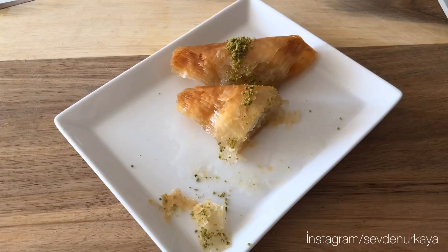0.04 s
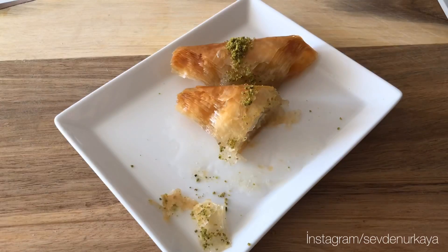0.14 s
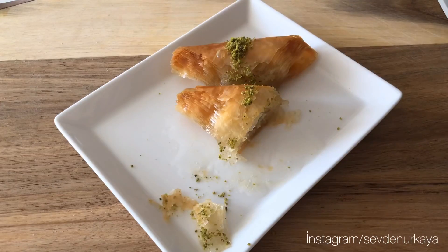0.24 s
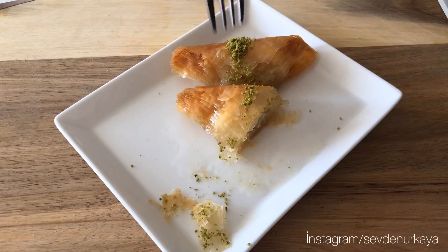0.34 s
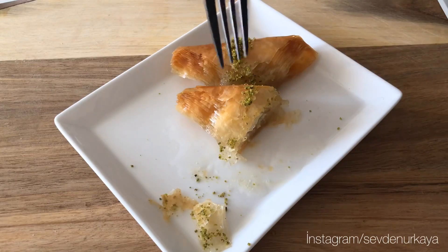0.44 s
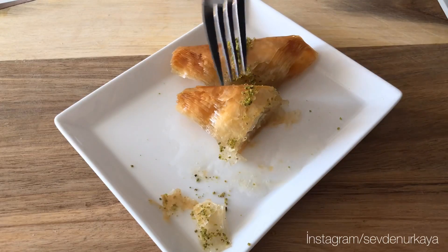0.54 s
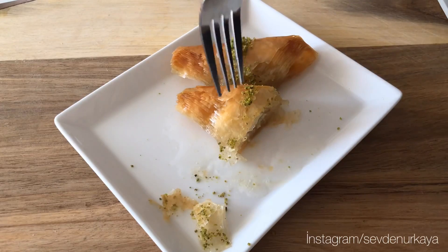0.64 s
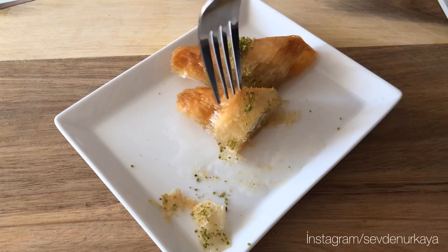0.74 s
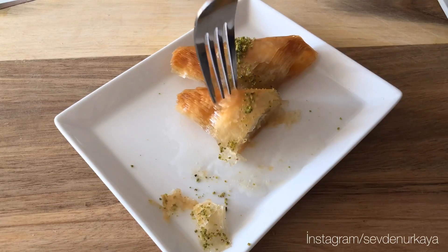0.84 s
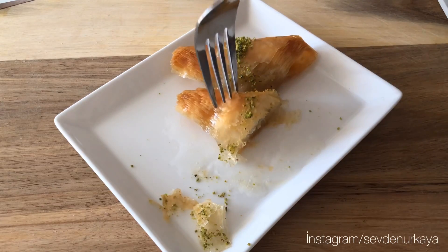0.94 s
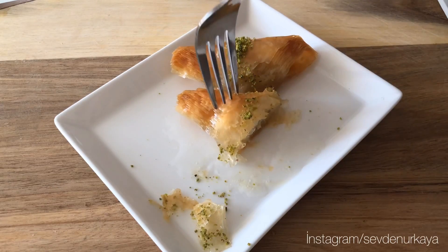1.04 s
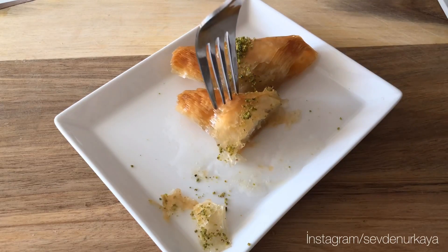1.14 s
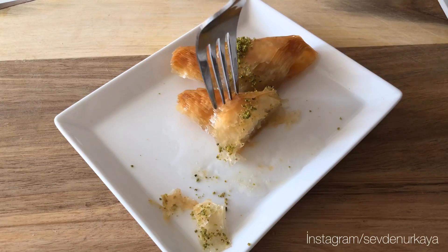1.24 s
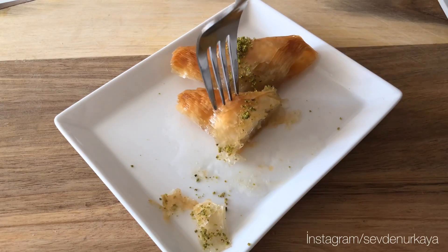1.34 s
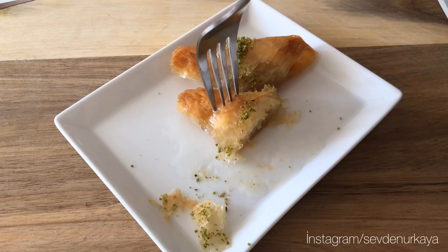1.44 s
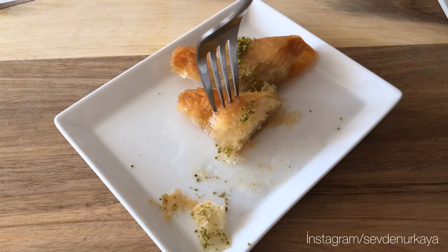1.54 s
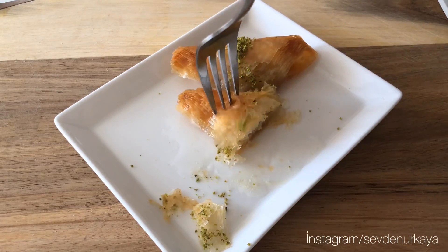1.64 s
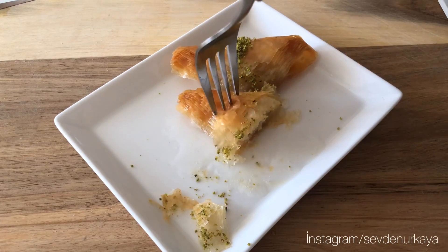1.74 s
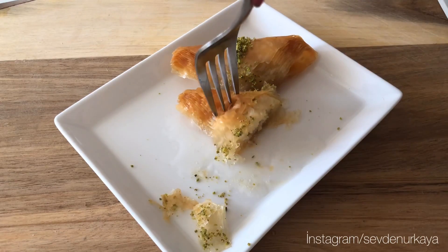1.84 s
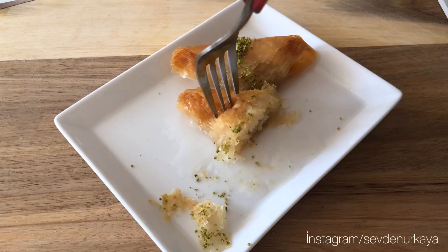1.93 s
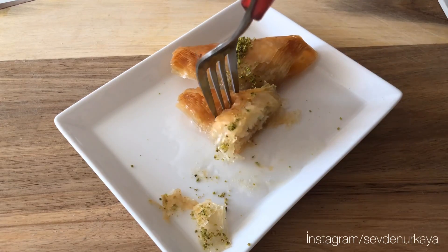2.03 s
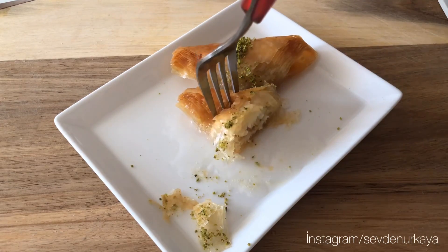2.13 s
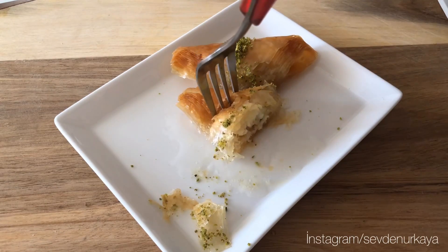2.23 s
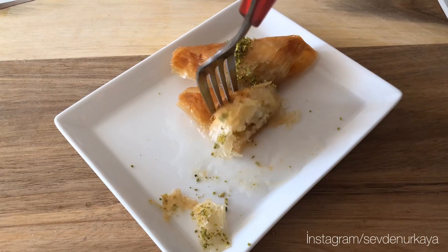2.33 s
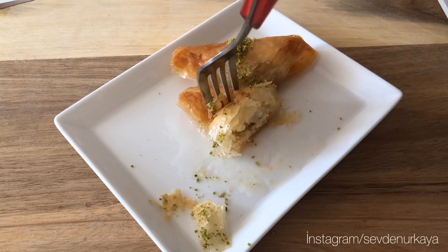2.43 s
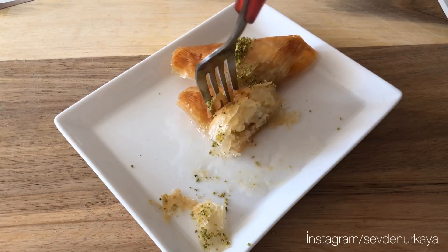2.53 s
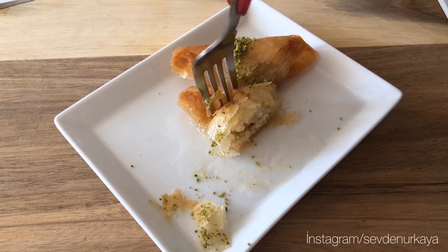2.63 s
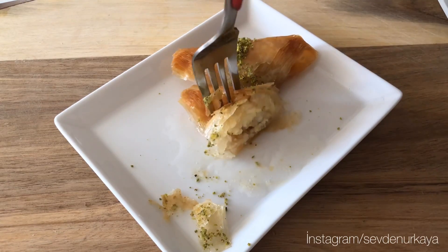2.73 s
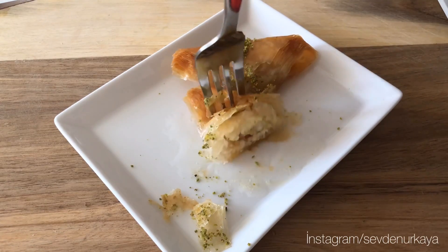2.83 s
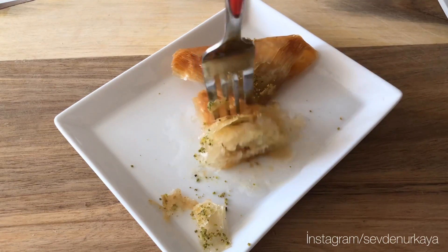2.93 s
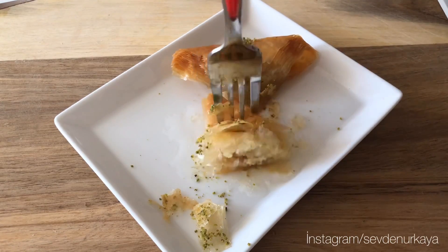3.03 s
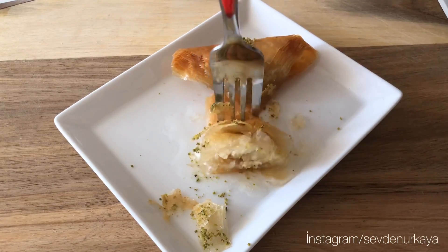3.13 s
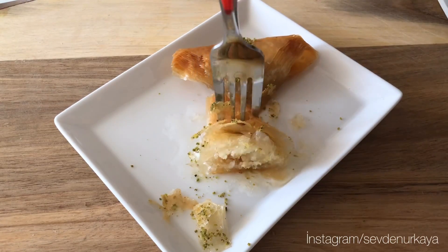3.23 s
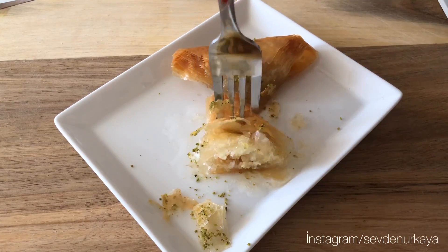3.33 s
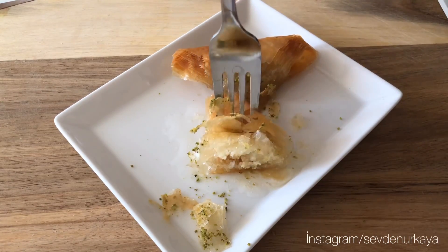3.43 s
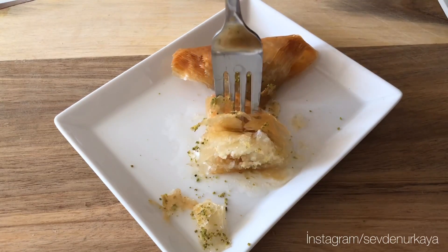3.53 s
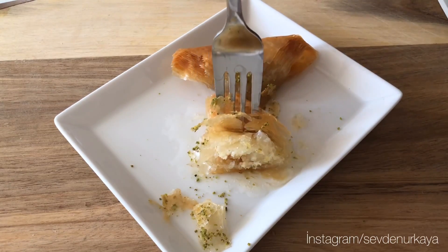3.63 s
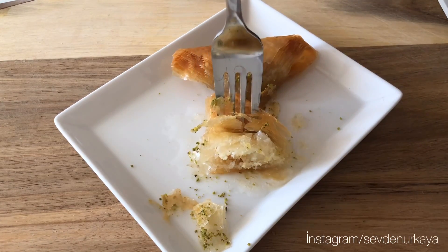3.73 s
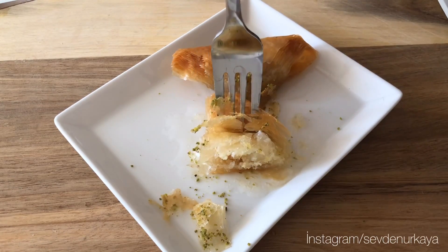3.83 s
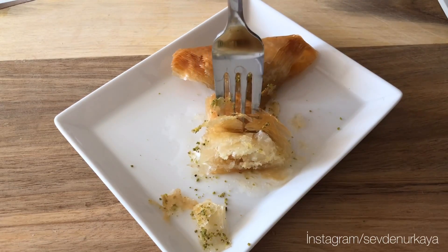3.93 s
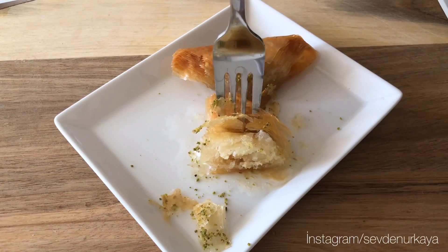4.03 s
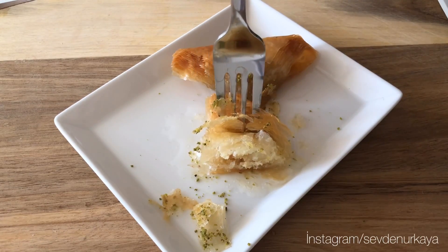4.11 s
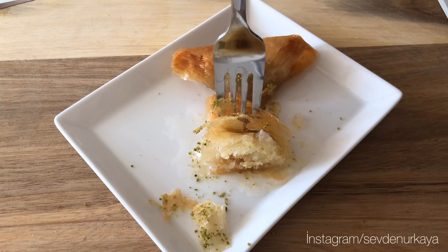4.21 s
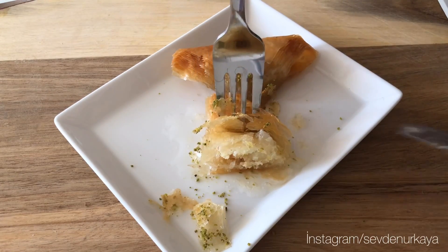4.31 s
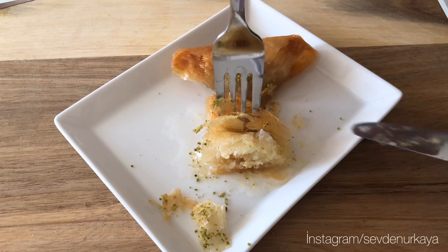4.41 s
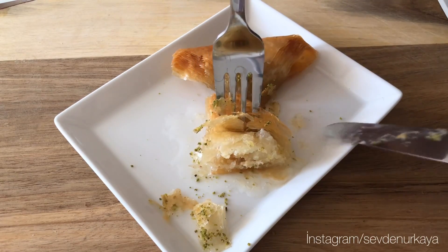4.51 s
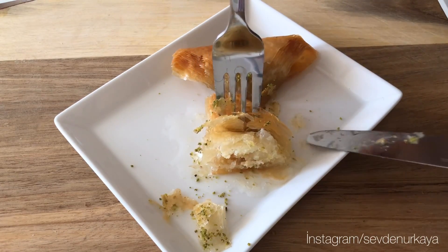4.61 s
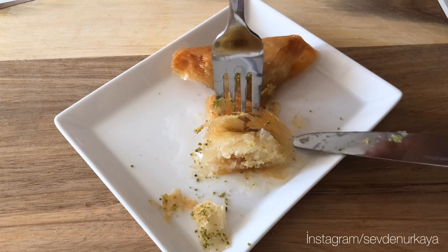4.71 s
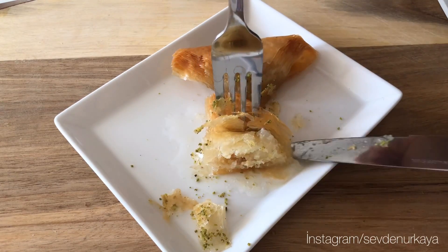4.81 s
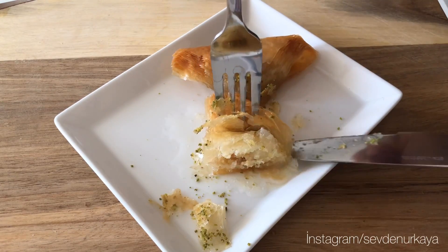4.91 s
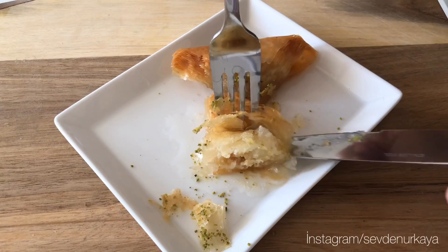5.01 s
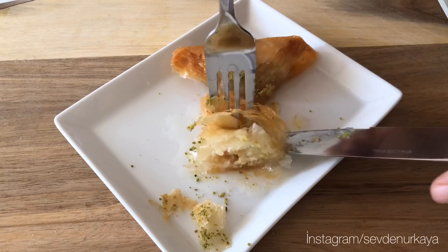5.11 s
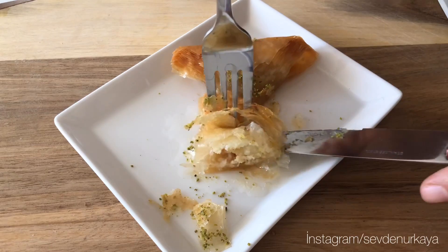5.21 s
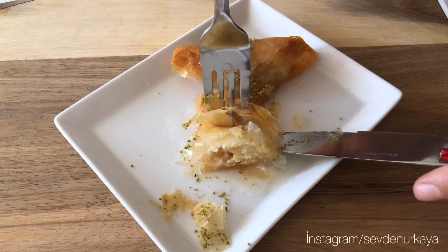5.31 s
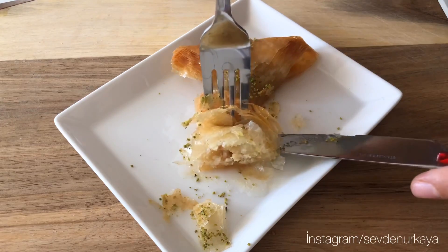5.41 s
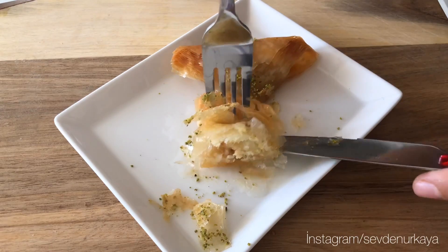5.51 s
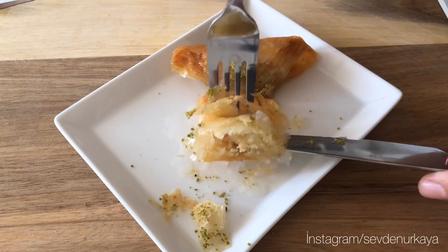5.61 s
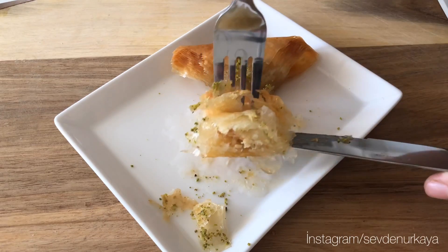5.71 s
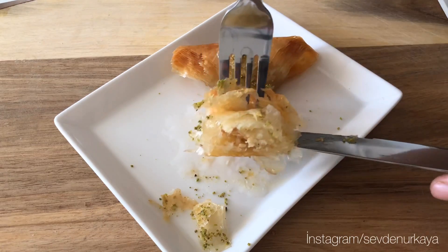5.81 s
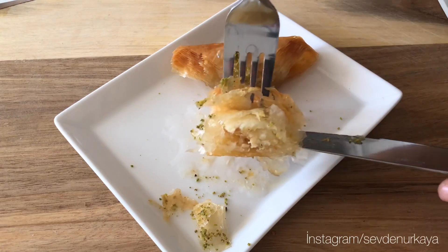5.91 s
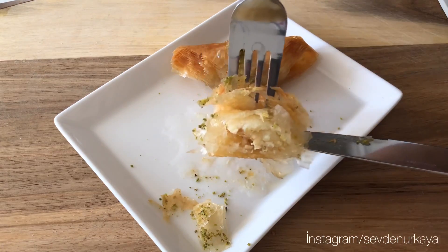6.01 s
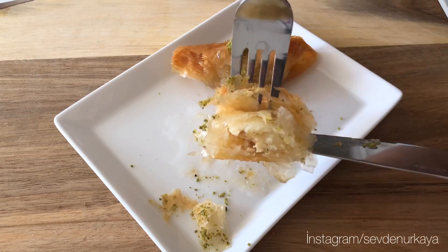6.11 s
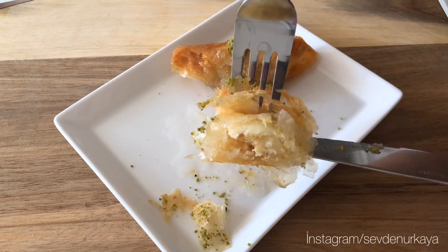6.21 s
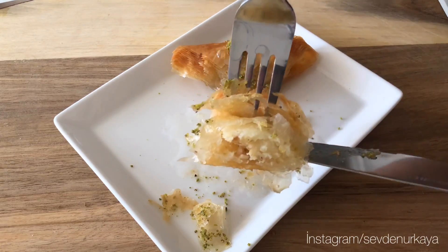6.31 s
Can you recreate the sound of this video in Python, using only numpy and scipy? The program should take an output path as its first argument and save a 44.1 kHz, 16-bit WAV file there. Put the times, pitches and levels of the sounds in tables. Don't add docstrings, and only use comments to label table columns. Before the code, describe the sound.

Dry, bright crackling of flaky pastry crushed by a fork, a few sharp snaps, one light cutlery clink on ceramic, faint refrigerator hum.

```python
import sys
import numpy as np
from scipy import signal
from scipy.fft import rfft, irfft, next_fast_len
from scipy.io import wavfile
from scipy.ndimage import uniform_filter1d, map_coordinates

SR = 44100
rng = np.random.default_rng(int(sys.argv[2]) if len(sys.argv) > 2 else 0)


def ratio(d):
    e = np.asarray(d, float) / 20
    return 10 ** e


def int16_out(signal):
    q = np.round(np.clip(np.atleast_2d(signal).T, -1, 1) * 32767)
    wavfile.write(sys.argv[1], SR, q.astype(np.int16))


N = 280108
T = np.arange(N) / SR


def unit(x):
    return x / np.sqrt(np.mean(x ** 2) + 1e-20)


def along(points, hz):
    f, v = np.transpose(points)
    return np.interp(np.log(hz + 1), np.log(f + 1), v)


def wobble(rate):
    knots = rng.standard_normal(int(N * rate / SR) + 4)
    return np.interp(T, T[::64], map_coordinates(knots, [T[::64] * rate]))


def filtered(x, response):
    m = next_fast_len(N + SR // 2)
    return irfft(rfft(x, m) * response(np.fft.rfftfreq(m, 1 / SR)), m)[:N]


def coloured(x, spectrum):
    shaped = filtered(x, lambda hz: ratio(along(spectrum, hz)))
    return unit(shaped) * np.sqrt(np.mean(x ** 2))


def lay(s, shapes):
    at = np.round(s * SR).astype(int)[:, None] + np.arange(shapes.shape[1])
    return np.bincount(at.ravel(), shapes.ravel(), N + SR)[:N]


def swell(t, rise, fall):
    after = t - rise * 2
    return np.exp(-(np.minimum(after, 0) / rise) ** 2 - np.maximum(after, 0) / fall)


# multiple (of the turning rate), level_db [dB rms]
ORDERS_DB = [(1, -53.5), (2, -72), (15, -84.5), (18, -93.5), (20, -78.5), (23, -82), (24, -86.5), (26, -92),
             (30, -87.5), (68, -92), (92, -90.5)]
# pitch_hz [Hz], level_db [dB per Hz]
AIR = [(20, -60.5), (40, -30), (80, -18.5), (110, -22), (155, -14), (230, -23.5), (480, -26.5),
       (700, -33.5), (1500, -36.5), (2200, -46.5), (3300, -46), (6000, -45), (9500, -48), (14000, -56)]
MOTOR_HZ = 66.5


def kitchen():
    turn = 2 * np.pi * np.cumsum(MOTOR_HZ + .05 * wobble(1.5)) / SR
    sway = wobble(5.95)
    hum = np.zeros(N)
    for k, db in ORDERS_DB:
        k = round(k)
        level_db = db + (0.9 + .04 * k) * np.roll(sway, k * 3000)
        hum += np.sqrt(2) * ratio(level_db) * np.sin(k * turn + 6 * rng.random())
    air = coloured(rng.standard_normal(N), AIR)
    return hum + ratio(-60.5 + 0.31 * wobble(3.7)) * air


# start_s [s], hold_s [s], crumb_spray_db [dB rms]
PUSHES = [(0.819, 0.024, -60.5), (0.867, 0.017, -58), (0.942, 0.072, -61), (1.038, 0.13, -65),
          (1.385, 0.049, -59), (1.494, 0.076, -54.5), (1.642, 0.032, -37), (1.714, 0.16, -49.5),
          (1.83, 0.057, -43), (1.96, 0.084, -37), (2.05, .13, -47.5), (2.269, .17, -45),
          (2.48, 0.19, -68.5), (2.656, 0.14, -61.5), (2.836, 0.041, -61.5), (2.92, 0.16, -62),
          (3.09, 0.14, -67), (3.372, .09, -61.5), (3.493, 0.054, -49), (3.553, 0.094, -62.5),
          (3.7, 0.47, -77.5), (4.126, 0.091, -68.5), (4.25, 0.37, -74.5), (4.498, 0.063, -67.5),
          (4.86, 0.11, -64.5), (4.97, 0.18, -65), (5.18, 0.086, -64.5), (5.347, 0.12, -72),
          (5.577, 0.085, -61.5), (5.633, 0.053, -70), (5.881, 0.38, -80)]
BUILD_DB_PER_S, EASE_DB_PER_S = 451, 218.5


def pressure_db(t):
    s, hold, db = np.transpose(PUSHES)[:, :, None]
    grid = T[::64]
    build = BUILD_DB_PER_S * np.maximum(s - grid, 0)
    ease = EASE_DB_PER_S * np.maximum(grid - s - hold, 0)
    power = np.sum(ratio(db - build - ease) ** 2, axis=0)
    return np.interp(t, grid, 10 * np.log10(power + 1e-13))


# pitch_hz [Hz], level_db [dB per Hz]
FLAKE = [(400, -43.5), (1000, -33.5), (1800, -18), (2800, -12.5), (3350, -9.5), (3700, -1), (4600, -0.5),
         (5500, -5.5), (6500, -1.5), (9200, 1.5), (12000, -4.5)]


def cracks(s, db, hz, rise, cycles, rasp_db, shiver_db):
    t, dice = np.arange(256) / SR, rng.standard_normal((len(s), 3 + 256))
    size, hz = ratio(db)[:, None], hz[:, None]
    fall_s = cycles * ratio(1.5 * dice[:, 1:2]) / hz
    note = np.cos(2 * np.pi * (hz * t + dice[:, :1])) * swell(t, rise, fall_s)
    tick = ratio(rasp_db + 2.9 * dice[:, 2:3]) * swell(t, rise, 0.00018)
    shiver = ratio(shiver_db) * swell(t, 0.0004, 0.0018)
    start = s - rise * 2
    notes = filtered(lay(start, size * note), lambda f: ratio(np.minimum(along(FLAKE, f) + 6, 0)))
    return notes + coloured(lay(start, size * (tick + shiver) * dice[:, 3:]), FLAKE)


CLUMP_DB = 3.4


def crumbs():
    dice = rng.random((5500, 2))
    when = .7 + 5.6 * dice[:, 0]
    spread_db = 2.4 * rng.standard_normal(len(when))
    hz = 7000 * ratio(spread_db - 0.02 * (pressure_db(when) + 57.0))
    db = -5.4 * np.log(dice[:, 1] + 0.029)
    flakes = cracks(when, db, np.clip(hz, 3600, 10500), rise=0.00031, cycles=1.6, rasp_db=-9.0, shiver_db=-12.0)
    return ratio(pressure_db(T) + 3.5) * unit(flakes * ratio(CLUMP_DB * wobble(45)))


# pitch_hz [Hz], width_hz [Hz], level_db [dB]
DRAG = [(492, 240, 1), (964, 130, 2), (1270, 250, -1.5), (1900, 138, 3), (2310, 510, -2), (3110, 220, -0.5)]
RUB_SWAY_DB = 2.5


def drag(crackle):
    jolt = np.sqrt(np.abs(uniform_filter1d(crackle ** 2, size=40)))
    rub = ratio(0.54 * pressure_db(T) - 26.0 + RUB_SWAY_DB * wobble(40))

    def body(f):
        total = 0
        for k, (centre, width, db) in enumerate(DRAG):
            spread = 1j * f * width
            total = total + (-1) ** k * ratio(db) * spread / (centre * centre - f * f + spread)
        return total

    return filtered((ratio(-24) * jolt + rub) * rng.standard_normal(N), body)


# start_s [s], peak_db [dB], pitch_hz [Hz]
CHIPS = [(0.8225, -45, 6600), (0.955, -44, 8500), (1.004, -43, 5270), (1.034, -41, 4800),
         (1.0496, -48, 6600), (1.0521, -46, 7800), (1.0765, -32.5, 6800), (1.1154, -35.5, 7100),
         (1.1573, -35, 7700), (1.1823, -36, 5300), (1.195, -32.5, 6200), (1.1985, -45, 6800),
         (1.2107, -35.5, 7400), (1.2444, -44, 7600), (1.3134, -39, 8000), (1.3463, -25, 5930),
         (1.3891, -35, 8500), (1.3921, -39, 9010), (1.4024, -36.5, 8400), (1.4056, -26, 8600),
         (1.4237, -19.5, 7500), (1.4264, -29, 9200), (1.4555, -35.5, 4400), (1.4902, -35, 8220),
         (1.4969, -40.5, 7150), (1.5135, -31, 4996), (1.5256, -31, 7180), (1.5985, -33.5, 7520),
         (1.619, -34, 6500), (1.631, -18, 8420), (1.6482, -27.5, 6900), (1.6794, -18, 7220),
         (1.713, -27, 8000), (1.727, -26, 6600),
         (1.7544, -33, 5200), (1.78, -31.5, 8900), (1.8007, -33.5, 5200), (1.8075, -30.5, 8200),
              (1.8112, -32, 6300), (1.823, -30, 8500), (1.843, -26, 6800), (1.8532, -18, 7100),
              (1.8566, -24, 6000), (1.862, -22.5, 5430), (1.8673, -28.5, 7300), (1.8863, -25.5, 8400),
              (1.8938, -24, 7600), (1.912, -29, 7700), (1.9162, -24.5, 8300), (1.928, -20, 6750),
              (1.933, -21.5, 9000), (1.9447, -25.5, 7700), (1.95, -17.5, 7450), (1.956, -19.5, 6600),
              (1.976, -21, 7440), (1.981, -21.5, 8100), (1.989, -16, 9200), (1.9985, -15.5, 8900),
              (2.0006, -13, 9050), (2.0039, -22, 9160), (2.007, -20.5, 8200), (2.0534, -25, 5200),
              (2.0648, -28, 5000), (2.0679, -29, 7200), (2.088, -26.5, 5300), (2.0899, -26.5, 5400),
              (2.0965, -21.5, 8400), (2.106, -30, 7000), (2.1132, -30, 5500), (2.1224, -29, 7900),
              (2.1933, -40.5, 5400), (2.2162, -26.5, 5000), (2.2194, -36, 6200), (2.255, -31, 5000),
              (2.2605, -29.5, 5500), (2.265, -30.5, 4900), (2.2923, -29, 5600), (2.2994, -31, 5800),
              (2.369, -29.5, 8500), (2.3891, -35.5, 6900), (2.4074, -31.5, 4900), (2.4159, -27.5, 7300),
              (2.422, -29, 5400), (2.4395, -26.5, 7100), (2.4816, -34, 6900), (2.5272, -41, 7200),
              (2.5524, -41.5, 8200),
         (2.623, -45, 7000), (2.6344, -41, 7700), (2.6793, -25, 3880), (2.7527, -45, 6800),
              (2.7685, -45, 5900), (2.7724, -46.5, 5400), (2.7826, -48, 5900), (2.8089, -53, 8100),
              (2.8466, -44.5, 5500), (2.8744, -44.5, 7800), (2.8816, -47, 6000), (2.9612, -42, 7800),
              (3.01, -44, 6700), (3.1191, -49, 5900), (3.1507, -36, 7500), (3.1896, -40, 6800),
              (3.2955, -47.5, 4900), (3.299, -53.5, 5000), (3.3552, -46, 6500), (3.3588, -50.5, 7300),
              (3.3883, -33, 6500), (3.4943, -29, 6700), (3.5223, -31, 7300), (3.5262, -34, 7100),
              (3.563, -34.5, 7600), (3.8122, -51, 8200), (3.992, -49, 6300), (4.0141, -50, 6280),
              (4.039, -49.5, 6660), (4.148, -48, 7200), (4.363, -44, 6600), (4.5178, -43, 5600),
              (4.5463, -45, 5370), (4.615, -46.5, 6420),
         (4.9478, -44, 5650), (4.972, -40, 5900), (5.008, -44, 6500), (5.0357, -48, 5900),
              (5.0873, -42, 6100), (5.0996, -41.5, 7800), (5.1025, -46, 7700), (5.1126, -44, 7000),
              (5.1147, -45, 7400), (5.121, -40, 5700), (5.124, -42, 7200), (5.129, -41, 6300),
              (5.1344, -41, 6000), (5.1414, -43, 7700), (5.193, -41, 6700), (5.2508, -46, 6700),
              (5.2714, -42, 7700), (5.2746, -43, 6400), (5.277, -47.5, 6900), (5.3305, -44, 7000),
              (5.3813, -47, 5700), (5.396, -48, 7700), (5.4001, -48, 7800), (5.4288, -43.5, 7250),
              (5.438, -50, 7200), (5.4523, -40, 7600), (5.4714, -53, 7400), (5.484, -43, 7100),
              (5.5237, -41.5, 6700), (5.563, -47, 7100), (5.5715, -46, 7000), (5.639, -38.5, 8000),
              (5.7384, -48, 7320), (5.7611, -49, 6760), (5.9555, -53.5, 5790), (5.9653, -52, 5600),
              (6.1605, -52, 5580)]


def chips():
    s, db, hz = np.transpose(CHIPS)
    return cracks(s, db - .6, hz, rise=.00028, cycles=0.94, rasp_db=-7.5, shiver_db=-14)


# start_s [s], length_s [s], level_db [dB rms], pitch_hz [Hz], width_hz [Hz]
RUBS = [(0.829, 0.09, -59, 3950, 690), (.841, 0.071, -64, 1290, 320), (2.421, 0.07, -64, 2115, 35),
        (2.471, .135, -72, 2117, 22), (2.414, 0.041, -51, 975, 320), (2.411, 0.135, -64, 1325, 35),
        (2.754, 0.031, -64, 1310, 640), (2.412, 0.037, -51, 1910, 260), (3.012, 0.03, -66, 1850, 300),
        (5.169, .19, -66.5, 1000, 950), (2.916, 0.091, -59.5, 3850, 420), (4.864, 0.03, -65, 1440, 800),
        (5.18, 0.071, -68.5, 768, 45), (5.172, 0.085, -64.5, 1170, 450), (5.198, 0.056, -67.5, 1995, 55),
        (5.263, 0.06, -65, 1331, 60), (5.54, 0.074, -65, 1240, 510), (5.176, 0.07, -64, 4400, 1600),
        (5.89, 0.05, -65.5, 1210, 260)]
# start_s [s], length_s [s], level_db [dB rms], slips_hz [slips per s]
SQUEAK = (6.232, 0.11, -63.5, 595)
# pitch_hz [Hz], level_db [dB]
SLIP = [(500, -17), (1200, 2), (3000, -3.5), (3700, -12), (5000, -38)]


def rubs():
    out, t = np.zeros(N), np.arange(SR // 4) / SR

    def bump(length):
        return np.sqrt(np.abs(np.sin(np.pi * np.clip(t / length, 0, 1))))

    for s, length, db, hz, width in RUBS:
        off = (np.fft.rfftfreq(len(t), 1 / SR) - hz) / width
        grit = irfft(rfft(rng.standard_normal(len(t))) / (1 + off ** 2), len(t))
        out += lay(np.array([s]), ratio(db) * (bump(length) * unit(grit))[None])

    s, length, db, hz = SQUEAK
    turn = 2 * np.pi * np.cumsum(hz * (1 + 0.0223 * wobble(260)[:len(t)])) / SR
    squeak = np.zeros(len(t))
    for k in range(1, 8):
        level_db = along(SLIP, k * hz) + 4.0 * wobble(177)[:len(t)]
        squeak += ratio(level_db) * np.sin(k * turn)
    return out + lay(np.array([s]), ratio(db - 60 * t) * (bump(length) * unit(squeak))[None])


# start_s [s], peak_db [dB], pitch_hz [Hz]
PIERCE = [(.8587, -34.5, 5600), (1.0385, -26, 9000), (1.0604, -35, 7450), (1.0798, -27, 6900),
          (1.1041, -17.5, 6800), (1.1046, -24, 4500), (1.1532, -30.5, 7600), (1.1621, -23.5, 6900),
          (1.1678, -30, 7600), (1.1764, -31.5, 8650), (1.1898, -22, 6100), (1.2107, -32, 8140),
          (1.217, -33, 5000), (1.251, -32, 8000), (1.3463, -29, 4560), (1.3701, -22.5, 7850),
          (1.377, -22.5, 7450), (1.3859, -25.5, 5850), (1.3995, -21.5, 6300), (1.41, -22, 8450),
          (1.4189, -17, 9500), (1.4234, -23, 4630), (1.4386, -27, 6400), (1.4664, -21, 5900),
          (1.4762, -25.5, 7900), (1.5072, -23, 9100), (1.5213, -13.5, 7430), (1.529, -15.5, 8700),
          (1.5607, -16, 7700), (1.594, -25.5, 8300)]
# start_s [s], peak_db [dB], pitch_hz [Hz]
CRUSH = [(1.623, -20.5, 6400), (1.6271, -15.5, 8800), (1.6338, -16, 7350), (1.6418, -11, 8570),
         (1.6551, -18.5, 7550), (1.6626, -7, 7860), (1.6684, -6, 8260), (1.6716, -8, 9140),
         (1.679, -15, 7370), (1.692, -30, 5000), (1.7087, -23, 8600), (1.7166, -17.5, 8400),
         (1.761, -21.5, 8300), (1.786, -18.5, 8460), (1.795, -20.5, 8500), (1.8188, -23.5, 9100),
         (1.8283, -20, 9000), (1.851, -18, 7700), (1.8698, -28, 7700), (1.8818, -23, 7700),
         (1.899, -15.5, 8900), (1.92, -20.5, 8600), (1.935, -17, 7600), (1.941, -19.5, 7500),
         (1.961, -19, 7200), (1.9716, -15, 6000), (1.9838, -15, 7100), (1.9968, -20.5, 8600),
         (2.001, -17.5, 9050), (2.0258, -8, 6600)]
# start_s [s], peak_db [dB], pitch_hz [Hz]
PRY = [(2.055, -16.5, 9050), (2.0775, -13.5, 6600), (2.094, -20.5, 7760), (2.1088, -23, 4900),
       (2.155, -20.5, 6900), (2.173, -17.5, 7100), (2.199, -25.5, 5030), (2.228, -17, 7250),
       (2.24, -16.5, 7550), (2.2452, -25, 6600), (2.251, -22.5, 5200), (2.2754, -14.5, 6350),
       (2.282, -24.5, 4600), (2.3085, -14, 6750), (2.3455, -21, 6740), (2.3656, -29, 6800),
       (2.4246, -17, 8300), (2.428, -16.5, 3800), (2.427, -17.5, 6300), (2.437, -25, 6740),
       (2.454, -20, 7500), (2.509, -36.5, 6030), (2.5406, -38, 7100), (2.574, -27.5, 5000)]
# start_s [s], peak_db [dB], pitch_hz [Hz]
SNAPS = [(2.6592, -32.5, 4600), (2.6794, -19.5, 7650), (2.6958, -32.5, 4670), (2.7124, -38, 6200),
         (2.863, -33.5, 6900), (3.0055, -19.5, 6860), (3.0231, -24, 7850), (3.0467, -35.5, 6000),
         (3.0628, -36, 7200), (3.128, -34, 6850), (3.1393, -9, 7830), (3.2256, -39.5, 8000),
         (3.304, -35, 6550), (3.3774, -12.5, 6180), (3.3802, -24, 8300), (3.4225, -24.5, 7700),
         (3.4466, -26.5, 6700), (3.4605, -11.5, 6100), (3.463, -14, 5900), (3.481, -3, 7930),
         (3.4836, -6.5, 6180), (3.49, -24, 7000), (3.497, -25.5, 7040), (3.509, -29.5, 7850),
         (3.579, -27.5, 5800), (3.591, -31, 8800), (3.6472, -35.5, 5700), (3.7176, -43.5, 6860),
         (3.8044, -41, 7170)]
# start_s [s], peak_db [dB], pitch_hz [Hz]
LIFT = [(4.0763, -41.5, 5830), (4.183, -41.5, 6280), (4.3542, -33.5, 6900), (4.4353, -28.5, 8140),
        (4.444, -31.5, 7740), (4.4938, -16.5, 7000), (4.515, -37, 6160), (4.537, -35, 5560),
        (4.5606, -41, 7500), (4.8588, -21.5, 7560), (4.908, -40.5, 5460), (4.956, -24.5, 6600),
        (4.9857, -27.5, 5800), (4.9969, -22.5, 6400), (5.0808, -34.5, 8100), (5.108, -38, 7960),
        (5.262, -35, 6500), (5.3197, -41.5, 7500), (5.358, -38, 6660), (5.3655, -35, 7660),
        (5.392, -39, 7200), (5.407, -38, 7900), (5.416, -29.5, 7600), (5.4437, -38.5, 7500),
        (5.4774, -39, 7100), (5.496, -32.5, 7370), (5.5766, -32.5, 6430), (5.587, -30, 6850),
        (5.5902, -34, 8600), (5.6113, -32.5, 4960)]
AFTER_S, AFTER_DB = 0.0017, -12.5
CLEAN_ABOVE_DB, CLEAN_RASP, CLEAN_CYCLES = -12, 2.3, 0.078


def snaps():
    crushed, bent = PIERCE + CRUSH + PRY, SNAPS + LIFT
    s, db, hz = np.transpose(crushed + bent)
    dice = rng.standard_normal((len(s), 3))
    is_bent = np.arange(len(s)) >= len(crushed)
    clean = np.tile(np.maximum(db - CLEAN_ABOVE_DB, 0) * is_bent, 2)[:, None]
    rasp_db = np.tile(np.where(is_bent, -12, -4.5), 2)[:, None] - CLEAN_RASP * clean
    s = np.r_[s, s + AFTER_S * ratio(1.5 * dice[:, 0])]
    db = np.r_[db, db + AFTER_DB + 3 * dice[:, 1]]
    hz = np.r_[hz, np.clip(hz * ratio(1.2 * dice[:, 2]), 4000, 9500)]
    cycles = 0.48 + CLEAN_CYCLES * clean
    return cracks(s, db + .5, hz, rise=.0003, cycles=cycles, rasp_db=rasp_db, shiver_db=rasp_db / 2 - 13.5)


# start_s [s], peak_db [dB],
# pitch_hz [Hz]
THUDS = [(1.645, -41.5, 420), (2.04, -48, 400), (2.108, -43.5, 466), (2.424, -40, 580), (2.449, -39, 106),
         (2.484, -43, 101), (2.678, -47.5, 1900), (3.031, -51.5, 1890), (3.037, -45.5, 447),
         (3.098, -57, 2200), (3.172, -49.5, 1990), (3.055, -44, 97), (3.088, -51, 94.5), (3.102, -45, 445),
         (3.12, -40, 97), (3.175, -44, 440), (3.194, -45, 85), (4.7197, -43, 488)]


def thuds():
    s, db, hz = np.transpose(THUDS)[:, :, None]
    t = np.arange(SR // 10) / SR
    return lay(s[:, 0], ratio(db) * np.sin(2 * np.pi * hz * t) * swell(t, 0.0015, 0.99 / hz))


# start_s [s], peak_db [dB], chatter_s [s]
TAPS = [
    (2.428, -38.5, 0.0032),
    (4.718, -25.5, 0.0056),
]
# pitch_hz [Hz], level_db [dB], fade_s [s to fall 60 dB]
PLATE = [(392, -10, 0.29), (460, -7, 0.49), (508, -5, 0.18), (915, -3.5, 0.21), (1013, -5, 0.21),
         (1646, -2, 0.16), (1750, -3, .25), (2045, -10, 0.5), (2096, -13, 0.89), (2366, -13.5, 0.34),
         (2405, -11, 1.1), (3056, -3.5, 0.14), (3180, -11, 0.3), (3470, -13, .3)]
# pitch_hz [Hz], level_db [dB], fade_s [s to fall 60 dB]
BLADE = [(3980, -11, 0.48), (4060, -3, 0.41), (5010, -15, .4), (5710, -8, .3), (6140, -11, 0.25),
         (6250, -17, .23), (6700, -9, .5), (7350, -12, .4), (7811, -14, .4), (8140, 6, .2),
         (8226, -1.5, 0.32), (8400, -5, 0.2), (9550, -20, .18)]
# pitch_hz [Hz], level_db [dB per Hz]
TAP = [(250, -27), (1000, -2), (1730, -6.5), (2700, -26), (3300, -7), (4700, -20), (5840, 0), (7060, -15),
       (8270, -8.5), (10500, -10), (11000, -30), (22000, -69)]
DAMPED_S = .155
FLUTTER_DB = 4.2
WANDER = .0045


def taps():
    t, out, grip = np.arange(SR // 4) / SR, np.zeros(N), wobble(95)

    def sway():
        return grip[rng.integers(N - len(t)):][:len(t)]

    def ring(hz, level_db, t60, bright_db):
        tilt_db = bright_db * np.log10(hz / 1500)
        flutter_db = FLUTTER_DB * sway() * np.minimum(t / 0.016, 1)
        strayed = t + WANDER * np.cumsum(sway()) / SR
        tone = np.sin(2 * np.pi * (hz * strayed + rng.random() / 4))
        damped_s = DAMPED_S * (1 + .6 * (hz < 2600))
        held = 1 / (1 + np.exp((t - damped_s) / .022))
        return ratio(level_db + tilt_db - 60 * t / t60 + flutter_db) * tone * held

    for (s, db, length), bright_db, ring_db in zip(TAPS, (-14, .6), (-27, -25)):
        ringing = sum(ring(hz, level_db, t60, bright_db) for hz, level_db, t60 in PLATE + BLADE)
        pressed = 1 + ratio(15.0) / (1 + np.exp((t - length) / 0.00084))
        onset = np.minimum(t / 0.00092, 1)
        out += lay(np.array([s]), ratio(db + ring_db) * (ringing * pressed * onset)[None])
        contact = ratio(-60 * np.maximum(t - length, 0) / 0.0065) + ratio(-21.0)
        chatter = rng.standard_normal(len(t)) * swell(t, 0.00022, 0.075) * contact
        out += coloured(lay(np.array([s]), ratio(db - 5.0) * chatter[None]), TAP)
    return out


# pitch_hz [Hz], fade_s [s to fall 60 dB]
ROOM = [(300, 0.81), (3000, 0.56), (5000, 0.34), (10000, 0.2)]


def room(x):
    pieces = np.pad(x, (0, -N % 4096)).reshape(-1, 4096)
    hz, t, z = signal.stft(rng.standard_normal((len(pieces), SR // 4)), SR, nperseg=256)
    fade = ratio(-60 * t / along(ROOM, hz)[:, None])
    tails = signal.istft(z * fade, SR, nperseg=256)[1]
    tails = tails / np.linalg.norm(tails, axis=1, keepdims=True)
    wet = signal.fftconvolve(pieces, tails, axes=1)
    return lay((np.arange(len(pieces)) * 4096 + 200) / SR, wet)


def scene():
    crackle = snaps() + crumbs() + chips()
    near = crackle + drag(crackle) + rubs() + taps() + thuds()
    return (near + ratio(-16.5) * room(near) + kitchen())[None]


def roll_off(x):
    return signal.sosfilt(signal.butter(12, 11300, fs=SR, output="sos"), x)


# pitch_hz [Hz], level_db [dB]
EDGE = [(9500, -1.5), (10050, -5), (10550, -26), (11000, -39.5), (12500, -57), (16000, -72)]


def record(dry):
    mix = filtered(dry[0], lambda hz: ratio(along(EDGE, hz)))[None]
    return roll_off(mix)


dry = scene()
out = record(dry)
int16_out(out)
```